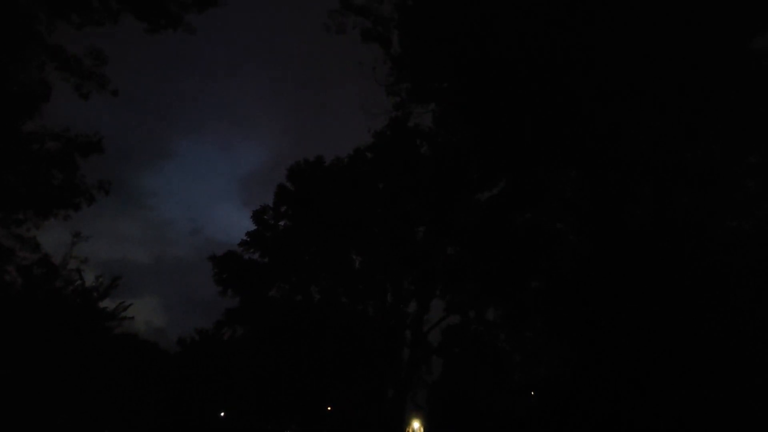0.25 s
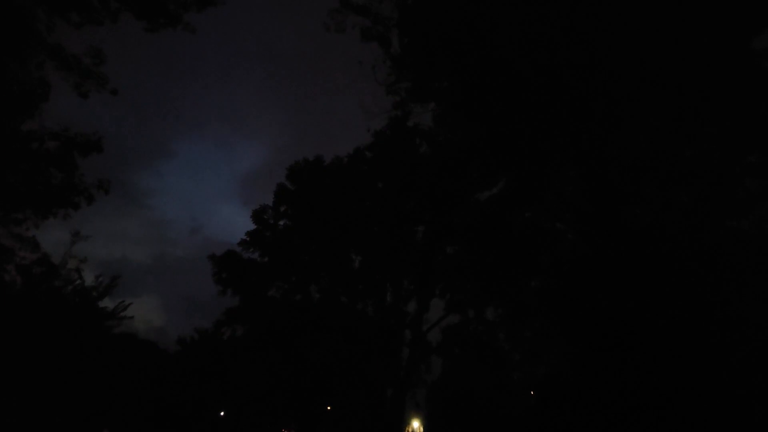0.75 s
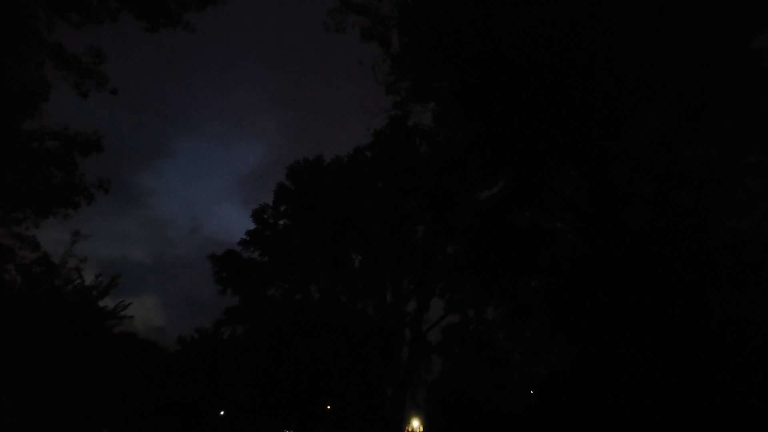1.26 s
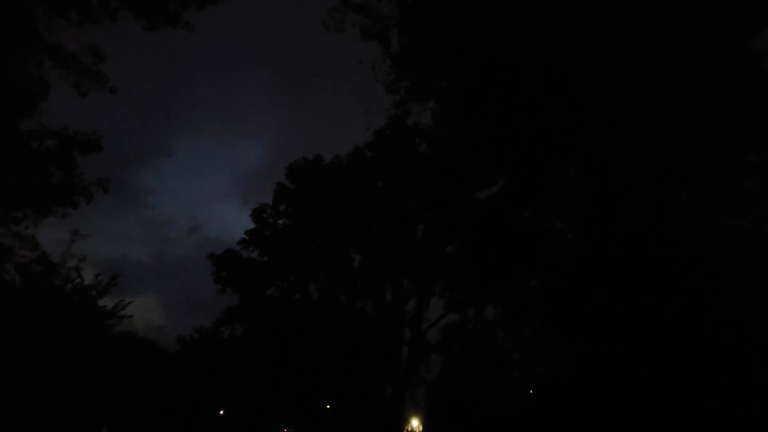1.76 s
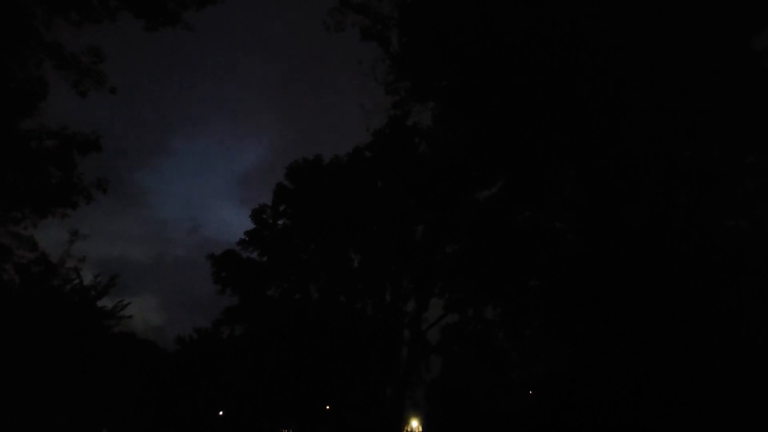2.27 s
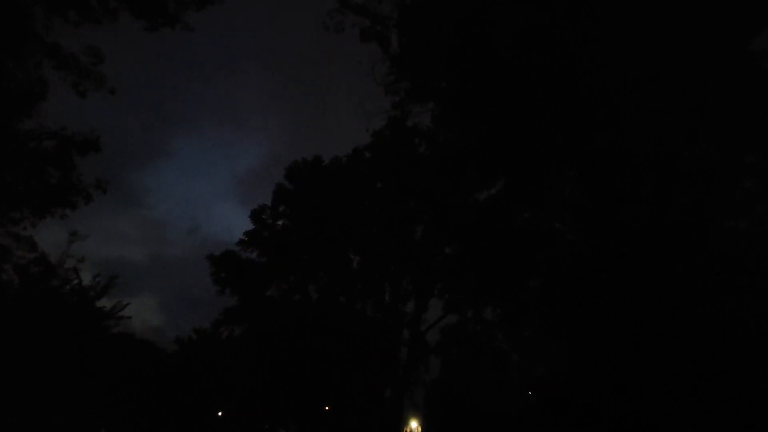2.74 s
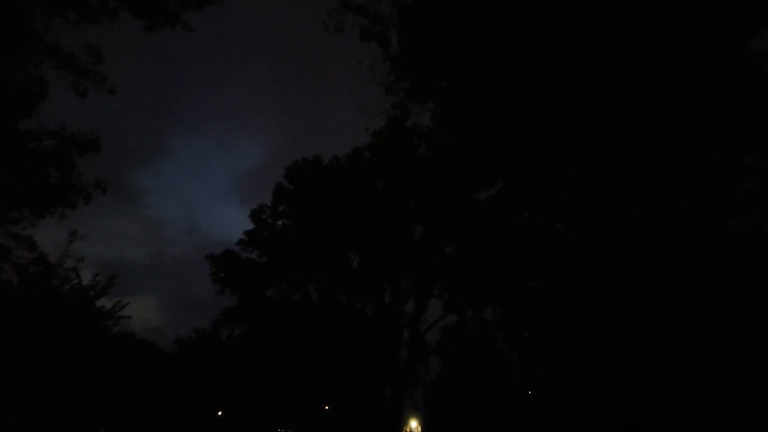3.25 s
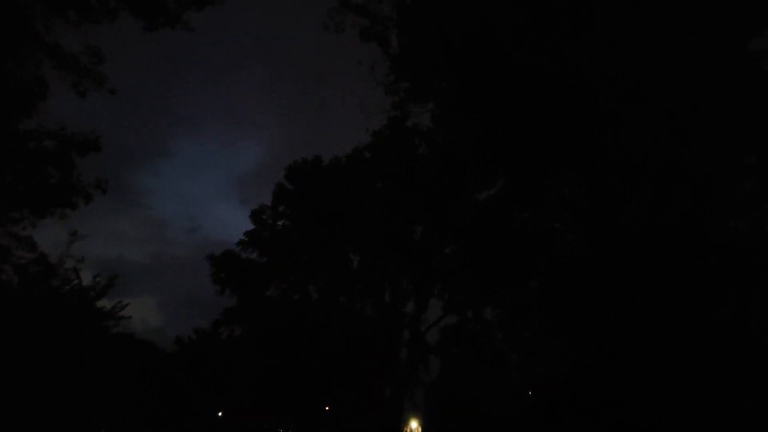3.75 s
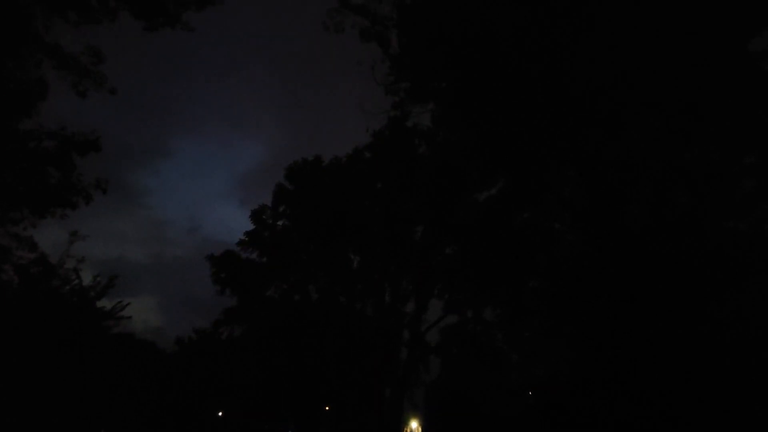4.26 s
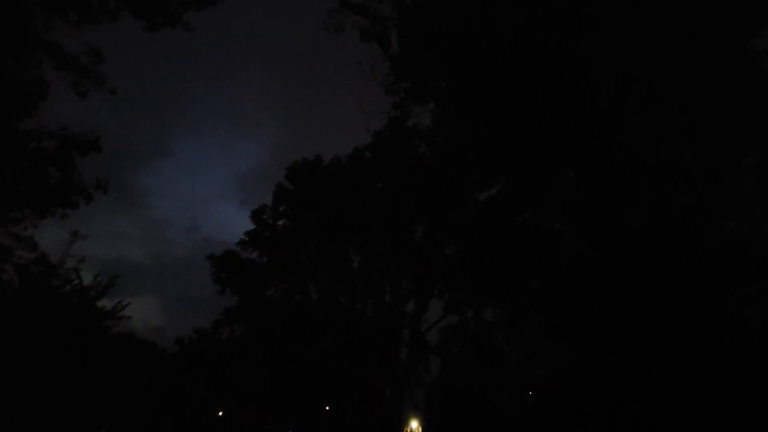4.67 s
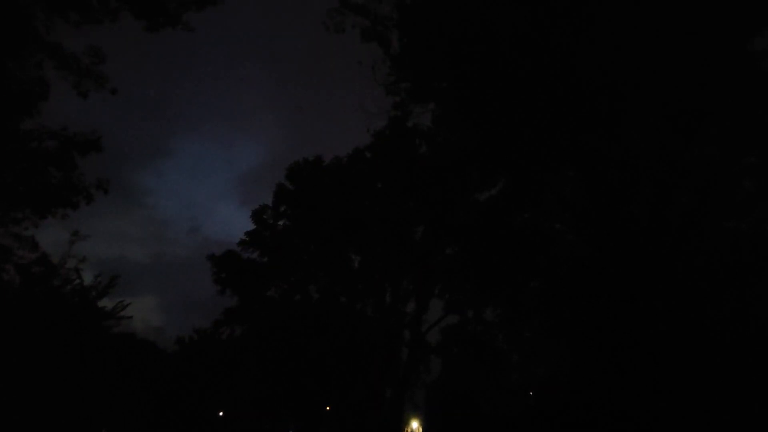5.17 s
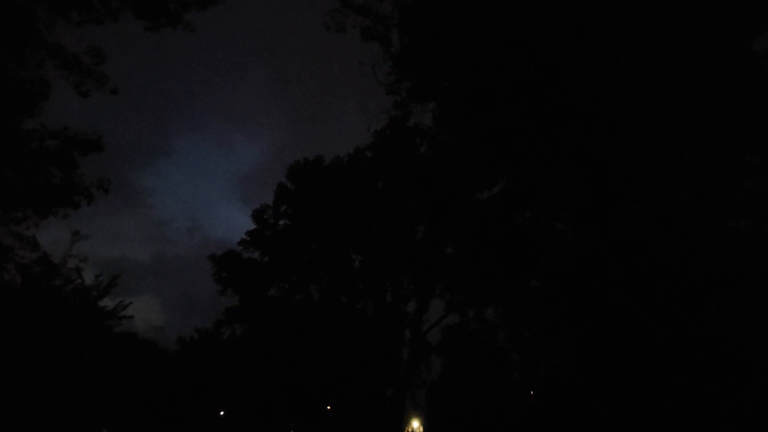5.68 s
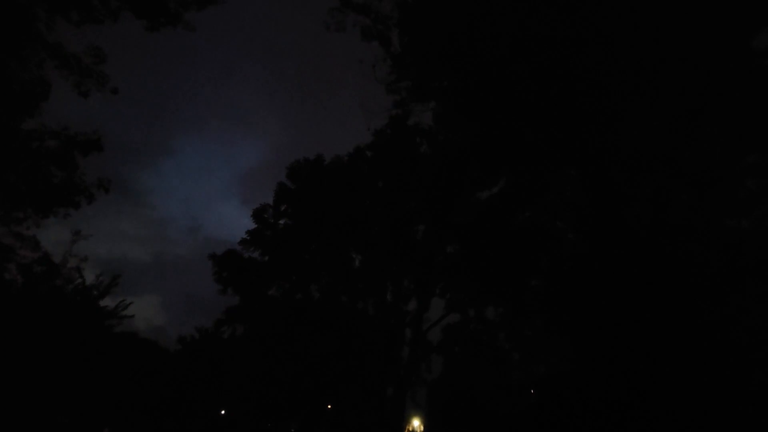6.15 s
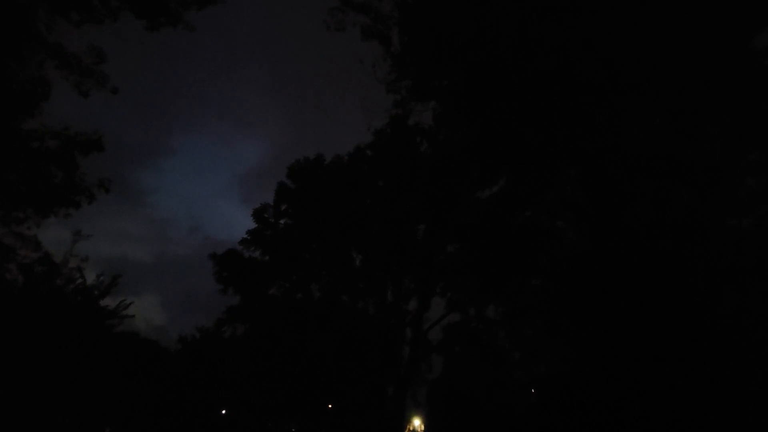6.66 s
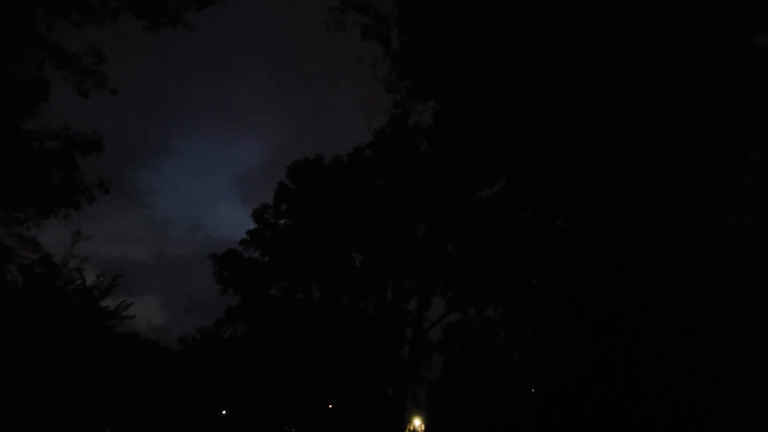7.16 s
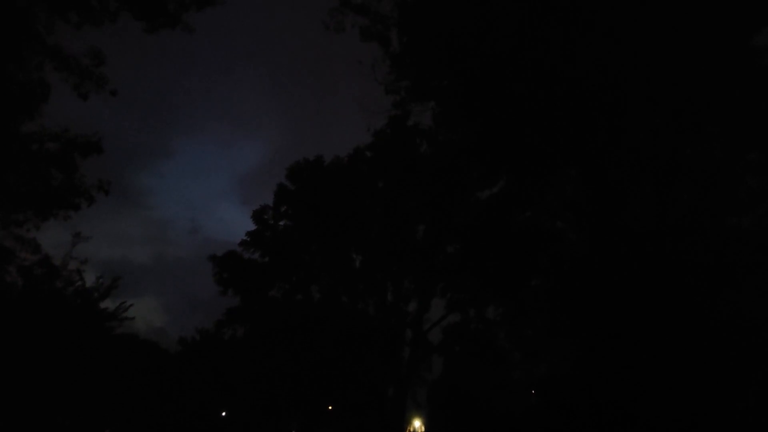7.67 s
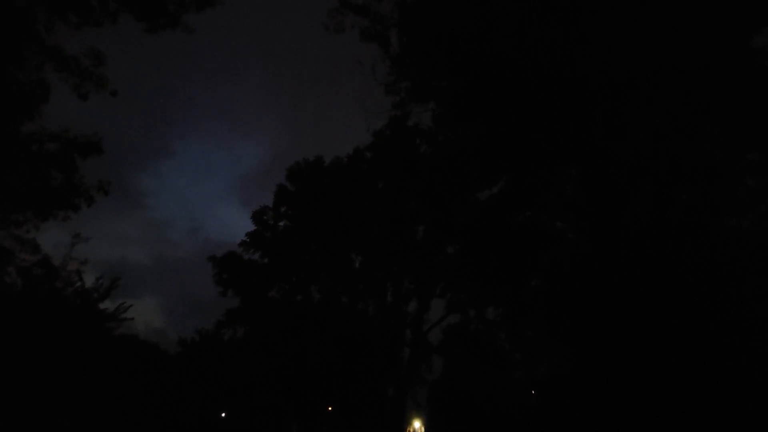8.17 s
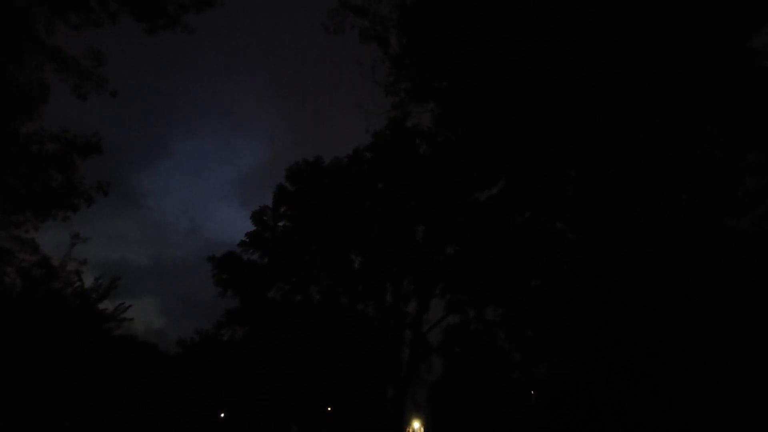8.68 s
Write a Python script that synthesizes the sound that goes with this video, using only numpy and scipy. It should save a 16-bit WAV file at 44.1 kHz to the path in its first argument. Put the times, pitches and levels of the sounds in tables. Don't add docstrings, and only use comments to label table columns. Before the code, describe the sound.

Warm-night tree crickets trill and katydids rasp in two-stroke calls over a hissing insect haze, while a distant engine fades into low thunder.

```python
import sys
import numpy as np
from scipy import signal
from scipy.io import wavfile
from scipy.ndimage import uniform_filter1d

SR = 44100
rng = np.random.default_rng(int(sys.argv[2]) if len(sys.argv) > 2 else 0)


def master_out(mix):
    frames = np.transpose(np.atleast_2d(mix))
    ceiling = np.clip(frames, -1, 1)
    pcm = np.round(ceiling * 32767).astype(np.int16)
    wavfile.write(sys.argv[1], SR, pcm)


def volts_from_db(level):
    exponent = np.asarray(level, float) / 20
    return 10 ** exponent


N = 393372
T = np.arange(N) / SR
SLOW = T[::64]
HZ = np.fft.rfftfreq(1024, 1 / SR)


def evened(x):
    return x / np.sqrt(np.mean(x ** 2) + 1e-20)


def sides(left_db, right_db):
    return volts_from_db(np.array([[left_db], [right_db]]))


def over_time(rows):
    s, *columns = np.transpose(rows)
    return np.array([np.interp(T, s, c) for c in columns])


def over_hz(points):
    hz, *columns = np.transpose(points)
    return np.array([np.interp(np.log(HZ + 1), np.log(hz + 1), c) for c in columns])


def waves(rows):
    bells = sum(db * np.exp(-.5 * ((SLOW - s) / half) ** 2) for s, half, db in rows)
    return np.interp(T, SLOW, bells)


def drift(per_s, count=1):
    knots = rng.standard_normal((count, 800))
    return np.array([np.interp(T * per_s, np.arange(800), k) for k in knots]) * 1.2


# frequency in Hz, likeness from 0 to 1.
SAME = [(60, .975), (150, .97), (220, .92), (330, .5), (500, .45), (1000, .5), (2000, .3), (4000, .25),
        (9000, .1)]
# frequency in Hz, delay in radians.
TURN = [(70, 0), (150, .2), (300, .8), (500, 2.2), (1300, 3.1), (2800, 6.2), (5000, 11)]


def ports(colour_db, drive=None, patchy_db=1.03):
    drive = rng.standard_normal((2, N)) if drive is None else drive
    a, b = signal.stft(drive, nperseg=1024, noverlap=768)[2]
    same = np.clip(over_hz(SAME).T, 0, 1)
    left = a * np.exp(-1j * over_hz(TURN).T)
    right = same * a + np.sqrt(1 - same ** 2) * b
    patches = uniform_filter1d(rng.standard_normal(a.shape), 10, 0)
    patches = evened(uniform_filter1d(patches, 16, 1))
    pair = np.array([left, right]) * volts_from_db(colour_db[:, :, None] + patchy_db * patches)
    return signal.istft(pair, nperseg=1024, noverlap=768)[1][:, :N]


def leaves(x, t60=.25, wet_db=0.):
    t = np.arange(SR // 2) / SR
    present = rng.random((2, len(t))) < .05
    taps = rng.standard_normal((2, len(t))) * present * volts_from_db(-60 * t / t60)
    tail = signal.oaconvolve(x.mean(0)[None], taps / np.linalg.norm(taps[0]), axes=1)[:, :N]
    return x + volts_from_db(wet_db) * tail


# frequency in Hz, left and right level in dB per Hz.
AIR = [(1500, -110, -110), (2550, -101, -99), (2900, -99, -76), (3540, -99, -90.5), (3740, -108, -100),
       (4000, -113, -110), (4550, -112, -110), (5100, -100.5, -102), (5470, -103, -106), (5550, -102, -104),
       (6200, -95.5, -103), (6810, -86.5, -101), (7480, -90.5, -101), (7400, -103, -105),
       (7880, -104, -106), (8450, -110, -116)]


def air():
    return ports(over_hz(AIR)) * np.sqrt(SR / 2)


def engine(rows, multiples, levels_db, fading_db=0):
    turns = 2 * np.pi * np.cumsum(over_time(rows)[0]) / SR
    fade, waver = drift(7.0, count=len(multiples)), drift(5.0, count=len(multiples))
    tone = np.zeros(N)
    for m, db, f, w in zip(multiples, levels_db, fading_db * fade, 0.35 * fading_db * waver):
        tone += np.sqrt(2) * volts_from_db(db + f) * np.sin(m * turns + w)
    start, end = rows[0][0], rows[-1][0]
    on = np.interp(T, [start - .04, start, end, end + 0.028], [0, 1, 1, 0])
    return tone * on * sides(-.45, .45)


# time in seconds, firing rate in Hz, level in dB.
PULL = [(0.0, 96.2, -35), (0.3, 94.35, -39.5), (0.45, 98.6, -34.5), (1.0, 98.75, -38.5),
        (1.25, 99.8, -32.5), (1.59, 100.7, -37.5), (1.85, 102, -36), (2.45, 103.1, -41.5),
        (3.27, 102.4, -50.5)]
# time in seconds, half length in seconds, change in dB.
CANCELS = [
    (.33, 0.028, -15),
    (.605, 0.038, -7),
    (.865, 0.03, -16),
    (1.07, 0.044, -4),
    (2.12, 0.068, -18.5),
    (2.28, 0.061, -6.5),
    (3.13, 0.06, -3),
    (3.21, 0.015, 14.5),
]
# multiple of the firing rate, level in dB.
OVERTONES = [(1.5, -62.5), (2, -59.5), (2.5, -64)]
# time in seconds, half length in seconds, change in dB.
OVERTONE_SWELLS = [
    [(0, 0.026, 11), (1.7, .3, 2)],
    [(.4, .09, 5), (.95, .1, 5.5), (1.22, .1, 4), (1.74, 0.13, 9), (2.15, .1, 3), (2.63, 0.09, 11),
     (3.1, 0.13, 6), (3.3, .05, -8)],
    [(.12, .15, 5), (.7, .25, -5), (1.25, 0.12, 3), (1.85, .45, 4.5), (2.9, .3, -10)],
]
# time in seconds, pitch in Hz, level in dB.
WHINE = [(0, 303, -69), (.3, 306, -59), (.7, 309, -62.5), (1.15, 314, -61), (1.35, 316, -75),
         (1.55, 318, -65), (1.7, 319, -71.5)]


def first_gear():
    upper_db = [db + waves(swells) for (_, db), swells in zip(OVERTONES, OVERTONE_SWELLS)]
    firing = engine(PULL, [1], [over_time(PULL)[1] + waves(CANCELS)])
    overtones = engine(PULL, [m for m, _ in OVERTONES], upper_db, 1.3)
    return firing + overtones + engine(WHINE, [1], over_time(WHINE)[1:], 3.0)


# frequency in Hz, level in dB.
ROLL = [(25, -24), (40, 0.5), (55, 8), (75, 23), (95, -11), (125, -14), (200, -51)]
# frequency in Hz, level in dB.
GROWL = [(60, -19), (95, 0.5), (130, 0), (200, 2), (280, -5.5), (360, -5.5), (500, -41.5)]
# time in seconds, half length in seconds, swell in dB.
PEALS = [
    (2.0, 0.8, 1.5),
    (3.5, 0.34, 3),
    (4.15, 0.13, 3.5),
    (4.7, 0.3, 4),
    (5.4, 0.25, 2),
    (6.3, 0.28, 0.5),
    (7.42, 0.19, 5),
    (8.1, 0.26, 2),
    (8.75, 0.064, 4),
]
# frequency in Hz, left and right level in dB.
ROAD = [(40, -21, -21), (150, 5, 5), (300, 5.5, 4), (397, -3.5, -2.5), (464, 3, 4), (578, -3, 3),
        (768, 4, 7), (1013, -1, -1), (1240, -1, 2.5), (1575, -4, -6), (1960, -10, -5), (2610, -12, -26),
        (3600, -37, -44)]


def thunder():
    peal_db = waves(PEALS)
    roll = evened(ports(over_hz(ROLL), patchy_db=1.5)) * volts_from_db(-51.5 + peal_db + 4.5)
    growl = evened(ports(over_hz(GROWL))) * volts_from_db(-61 + 1.18 * peal_db + 2.5)
    road_db = -58 - 0.6361 * np.minimum(T, 5.7)
    road = evened(ports(over_hz(ROAD), patchy_db=0.64)) * volts_from_db(road_db + 6.5)
    return (roll + growl) * sides(-.45, .45) + road


def choir(hz, spread_hz, per_s, spread_per_s, duty, fall_hz, lead_db, throb=0, count=12):
    out = np.zeros((2, N))
    wobble = drift(3.5, count=count)
    slip = 2 * np.pi * (5 * T % 1)
    strays = np.roll(np.sinh(1.48 * np.linspace(-1, 1, count)), -(count // 2))
    for k, (quick, loud, side, late) in enumerate(rng.standard_normal((count, 4))):
        other = k > 0
        rate = per_s + other * spread_per_s * quick
        stroke = np.cumsum(rate * (1 + (.0017 + .01 * other) * wobble[k])) / SR
        stroke = (stroke + late) % 1
        pitch = hz + other * spread_hz * strays[k] + fall_hz / 2 * (1 - stroke / duty)
        pitch = pitch * (1 + 0.0028 * other * wobble[k - 2])
        hump = abs(np.sin(np.pi * np.minimum(stroke / duty, 1))) ** 1.6
        pulse = hump * np.sin(2 * np.pi / rate * pitch * stroke + slip)
        phrase = 1 + throb * np.cos(2 * np.pi * 4.3 * SLOW + late + 1.2 * wobble[k - 1, ::64])
        near_db = 1.2 * loud - 2.2 * abs(strays[k]) if other else lead_db
        near_db = near_db + .9 * wobble[k - 3, ::64]
        pulse = pulse * np.interp(T, SLOW, phrase * volts_from_db(near_db))
        trail = round(14 + 6 * side * other)
        out[0] += np.roll(pulse, trail) * volts_from_db(1.5 * side * other)
        out[1] += pulse * volts_from_db(-1.5 * side * other)
    return evened(out)


# time in seconds, half length in seconds, change in dB.
TREE_WAVES = [
    (.1, 0.12, 2),
    (1.0, 0.11, 1.5),
    (1.27, 0.11, -3),
    (2.7, 0.25, 1),
    (3.13, 0.096, -4.5),
    (4.9, 0.29, 0),
    (5.8, 0.2, -1),
    (6.14, 0.13, 2.5),
    (7.8, 0.14, -0.5),
]
# time in seconds, half length in seconds, change in dB.
LOW_WAVES = [
    (.3, 0.17, -4),
    (.9, 0.28, -2.5),
    (1.9, 0.35, -6),
    (6.14, 0.2, -8),
    (8.2, 0.47, -5.5),
]
# time in seconds, half length in seconds, change in dB.
GROUND_WAVES = [
    (0, 0.084, 3),
    (.45, 0.3, -2),
    (1.95, 0.32, -1.5),
    (6.12, 0.17, -1),
    (7.75, 0.12, -1),
    (8.3, 0.25, 2),
]


def crickets():
    tree_db = -52 + 0.4771 * T + waves(TREE_WAVES)
    low_db, ground_db = -68 + waves(LOW_WAVES), -60 + waves(GROUND_WAVES)
    tree = choir(3053.7, 52, 69.5, 7.0, 0.84, 107, 5.0, count=17) * sides(-2.5, 2.5)
    low = choir(5013, 70, 63.5, 7.0, 0.39, 280, 1.5, count=11)
    ground = choir(7030, 45, 41, 8.0, 0.5, 238, 1.0, throb=0.5, count=15)
    tree = evened(leaves(tree, 0.097, -11.0)) * volts_from_db(tree_db + 2.0) * sides(-1.2, 1.2)
    low = evened(leaves(low, 0.49, 2.1)) * volts_from_db(low_db + 4.0) * sides(3.5, -3.5)
    ground = evened(leaves(ground, 0.87, 2.4)) * volts_from_db(ground_db) * sides(5.0, -6.0)
    return tree + low + ground


# time in seconds, level in dB, left minus right in dB.
MEADOW = [(0.0, -66.5, -6), (1.6, -65, -6.5), (1.85, -68, -5), (3.2, -70.5, -7.5), (5.3, -71.5, -5.5),
          (7.0, -71.5, -8.5), (7.72, -75.5, -13), (7.85, -70.5, -10), (8.92, -71.5, -5)]
# frequency in Hz, left and right level in dB.
BROAD = [(8600, -11.5, -54), (9300, -8.5, -19), (9620, -10, -21), (9950, -5, -13), (10440, -9, -14.5),
         (11200, -10, -10.5), (11950, -8.5, -0.5), (13000, -5, 1.5), (13600, -2, 2), (14050, 3, 3),
         (14400, -3, -6), (15800, -8, -7)]
# frequency in Hz, level in dB.
TOP = [(13800, -31), (14500, -6), (15000, -1), (15700, -11)]
# time in seconds, half length in seconds, swell in dB.
JOINS = [
    (3.4, .08, 2),
    (4.12, .12, 1.5),
    (4.7, 0.067, 3),
    (6.1, .12, 1),
]
# start in seconds, length in seconds, level in dB, left minus right in dB.
TOP_PHRASES = [
    (-.1, 1.85, -68.5, 4),
    (2.2, 0.9, -77, -5),
    (3.3, 0.11, -75, -4),
    (3.502, 1.3, -88, 0),
    (4.749, 1.5, -78, -5),
    (6.4, 1.35, -75, -8),
    (7.79, .78, -73, -8),
]


def meadow():
    broad_db, broad_pan = over_time(MEADOW)
    side = np.array([[.5], [-.5]])
    broad = ports(over_hz(BROAD), patchy_db=0.9) * volts_from_db(.9 * drift(20.5))
    top = ports(over_hz(TOP)) * (1 + 0.43 * np.cos(2 * np.pi * 29.6 * T))
    sung = np.zeros((2, N))
    for s, length, db, pan in TOP_PHRASES:
        inside_s = np.minimum(T - s, s + length - T)
        sung += volts_from_db(db + side * pan) * np.clip(inside_s / .04 + .5, 0, 1)
    broad = evened(broad) * volts_from_db(broad_db + waves(JOINS) + side * broad_pan + 4.5)
    return broad + evened(top) * sung * volts_from_db(2.0)


# time in seconds, first and second stroke in dB,
# gap between them in seconds, lean to the left in dB.
KATYDIDS = [(.55, -54, -54, .14, -1), (1.17, -54, -54.5, 0.12, -1), (1.72, -60, -69, 0.12, -1),
            (2.59, -53.5, -54, .13, 1), (3.07, -65, -76, 0.12, -4), (3.37, -56, -54, 0.11, 3),
            (4.05, -53, -52.5, .14, 1), (4.68, -52, -59, 0.14, 1.5), (5.035, -52.5, -54, 0.15, 2),
            (5.94, -53.5, -51.5, 0.13, 2.5), (6.6, -54, -51.5, 0.11, 5), (7.23, -54.5, -52.5, .12, 2),
            (7.83, -54, -53.5, .13, 3), (8.47, -54.5, -51, 0.12, 3)]
# time in seconds, half length in seconds, left and right in dB.
FAR_WAVES = [(0.203, 0.14, -1, 3.5), (.85, .1, 2, 3), (1.55, .08, -3, 1), (2.253, 0.12, 1, 2.5),
             (3.05, .05, 3, 4), (3.596, 0.056, 5, 5), (4.3, .08, 0, -2), (5.4, .12, 2, 0.5),
             (5.68, 0.059, 5, 5), (6.22, 0.069, 4, 1), (6.847, 0.063, 5, 2), (7.05, .08, 1, -3),
             (7.5, .08, 6, 0), (8.1, 0.058, 6, 3), (8.38, .05, 5, 4), (8.85, .08, -2, -4)]


def strokes():
    rise_s, fall_s, echo_db, echo_s = 0.036, 0.045, -9, 0.13
    side = np.array([[1], [-1]])
    hush_db = waves([(call[0] - 0.17, 0.11, -1.5) for call in KATYDIDS])
    far_db = np.array([waves([(row[0], row[1], row[k]) for row in FAR_WAVES]) for k in (2, 3)])
    power = volts_from_db(2 * (-59.5 - 0.34 * T + hush_db + far_db) + side * 3.5)
    for s, first_db, second_db, gap, lean_db in KATYDIDS:
        for at, db in ((s, first_db), (s + gap, second_db)):
            near = slice(max(round((at - .15) * SR), 0), round((at + .9) * SR))
            late = np.maximum(T[near] - at, 0)
            early = np.minimum(T[near] - at, 0)
            fall = np.exp(-(late / fall_s) ** 2) + volts_from_db(2 * echo_db) * np.exp(-late / echo_s)
            rise = np.exp(-(early / rise_s) ** 2)
            power[:, near] += volts_from_db(2 * db + side * lean_db) * rise * fall
    return power


# pitch in Hz, width in Hz, level in dB, left minus right in dB.
WING = [(3564, 55, -14.5, -14), (3740, 135, -14, -9)]


def wing_ring():
    out = np.zeros((2, N))
    for hz, width_hz, db, lean_db in WING:
        r = np.exp(-np.pi * width_hz / SR)
        noise = rng.standard_normal(N) + 1j * rng.standard_normal(N)
        slow = signal.lfilter([1], [1, -2 * r, r * r], noise)
        ring = evened((slow * np.exp(2j * np.pi * hz * T)).real)
        out += ring * volts_from_db(db) * sides(.5 * lean_db, -.5 * lean_db)
    return out


# frequency in Hz, left and right level in dB.
RASP = [(1600, -26, -26), (2115, -7, -3), (2790, 2.5, 1.5), (3130, 11.5, 12), (3260, -3, 9),
        (3800, -6, 3.5), (4040, -4.5, 5), (4280, -3, -1), (4450, -1.5, 0), (5160, 0, -13),
        (5350, -4.5, -27), (6500, -29, -38)]


def katydids():
    teeth = rng.standard_normal((2, N)) * (.5 + (rng.random(N) < .03))
    rasp = evened(ports(over_hz(RASP), teeth, patchy_db=1.0))
    return (rasp * volts_from_db(2.5) + wing_ring()) * np.sqrt(strokes())


def bursts(rows, length, hz, width_hz, per_s):
    shape = waves([(s, length, volts_from_db(db)) for s, db in rows])
    strikes = (0.51 + np.cos(np.pi * per_s * T) ** 4) * rng.standard_normal(N)
    band = [hz - width_hz / 2, hz + width_hz / 2]
    wing = signal.butter(2, band, "bandpass", fs=SR, output="sos")
    return evened(signal.sosfilt(wing, strikes)) * shape * np.ones((2, 1))


def chirp_beats():
    s = 0.059 + .2006 * np.arange(45)
    s = s - 0.06 * np.exp(-((s - 8.3) / 0.41) ** 2)
    db = -75.5 + 2 * np.sin(np.pi * s / 10) + 1.5 * rng.standard_normal(len(s))
    return zip(s, db)


# time in seconds, level in dB.
TICKS = [(6.46, -75), (6.69, -75), (6.91, -75), (7.1, -75), (7.37, -81), (7.59, -73), (7.83, -74),
         (8.04, -72), (8.25, -71), (8.5, -71), (8.78, -72)]
# time in seconds, level in dB.
BUZZES = [
    (4.42, -74),
    (5.68, -75.5),
]


def small_insects():
    chirps = leaves(bursts(chirp_beats(), 0.031, 9220, 420, 230), 0.68, -1.7) * sides(1.5, -5.0)
    ticks = leaves(bursts(TICKS, 0.041, 9760, 590, 64), 0.22, -5.0) * sides(1.5, -9.0)
    buzzes = leaves(bursts(BUZZES, 0.18, 8040, 500, 60), .2, -6.0) * sides(1.5, -4.0)
    return chirps + ticks + buzzes


# time in seconds, firing rate in Hz, level in dB.
CRUISE = [(3.3, 88.1, -40.5), (3.45, 81.4, -45.5), (3.95, 80.9, -53), (4.35, 79.9, -46.5), (4.8, 77.5, -50),
          (5.15, 75.5, -49.5), (5.55, 76.65, -48.5), (5.75, 70.5, -58), (6.2, 69.8, -45), (6.35, 68.4, -75)]


def higher_gear():
    leaving_db = [db - 2.0 * (T - CRUISE[0][0]) for db in (-57.5, -67)]
    return engine(CRUISE, [1, 2, 3], [over_time(CRUISE)[1], *leaving_db], 2.5)


# time in seconds, firing rate in Hz, level in dB, 1.5 times tone in dB.
SURGE = [
    (7.1, 78.7, -65, -78),
    (7.112, 75.7, -53, -60),
    (7.266, 84.5, -36.5, -49.5),
    (7.43, 78.8, -44.5, -58),
    (7.6, 80.8, -40.5, -54),
    (7.72, 83.8, -58, -59.5),
]


def late_surge():
    return engine(SURGE, [1, 1.5], over_time(SURGE)[1:], 2.5)


# frequency in Hz, level in dB.
CRACKLE_COLOUR = [(150, -30), (250, -10), (350, -1), (430, -7), (600, -42)]


def crackle():
    s, half_s, db = 7.6, 0.21, -59
    return evened(ports(over_hz(CRACKLE_COLOUR))) * waves([(s, half_s, volts_from_db(db))])


# time in seconds, peak in dB.
SNAP = [
    (7.78703, -30),
    (7.7927, -40),
    (7.803, -37),
]


def snap():
    late = np.maximum(T - SNAP[0][0] - .0003, 0)
    high_start = np.pi * (1 - np.exp(-late / .0007))
    out = volts_from_db(-34.5) * np.sin(2 * np.pi * 115 * late + high_start) * np.exp(-late / .009)
    for s, db in SNAP:
        u = (T - s) / 0.00009
        out += volts_from_db(db) * (1 - 0.3 * u ** 2) * np.exp(-u ** 2 / 2)
    return -out * np.array([[1], [-.15]])


def scene():
    vehicle = first_gear() + higher_gear() + late_surge()
    insects = crickets() + meadow() + katydids() + small_insects()
    return air() + vehicle + thunder() + insects + crackle() + snap()


# frequency in Hz, level in dB per Hz.
HEARD = [(3000, -105), (4300, -100.5), (5600, -102), (6500, -104), (7450, -107), (7550, -102), (8900, -104),
         (9150, -108.5), (10800, -107), (12000, -110), (15000, -106.5)]


def starved(x):
    hz, _, z = signal.stft(x, SR, "cosine", nperseg=2048, noverlap=1024, scaling="psd")
    bands = 2 * (abs(z[:, :1024]) ** 2).reshape(2, 128, 8, -1).mean(2)
    limit_db = np.interp(hz[4:1024:8], *np.transpose(HEARD), left=-200)
    z[:, :1024] *= np.repeat(bands > volts_from_db(2 * limit_db)[:, None], 8, axis=1)
    return signal.istft(z, SR, "cosine", nperseg=2048, noverlap=1024, scaling="psd")[1][:, :N]


def roll_off(x):
    return signal.sosfilt(signal.butter(12, 15770, fs=SR, output="sos"), x)


def record(dry):
    bass_cut = signal.butter(3, 38, "highpass", fs=SR, output="sos")
    mix = starved(signal.sosfilt(bass_cut, dry))
    return roll_off(mix)


dry = scene()
out = record(dry)
master_out(out)
```